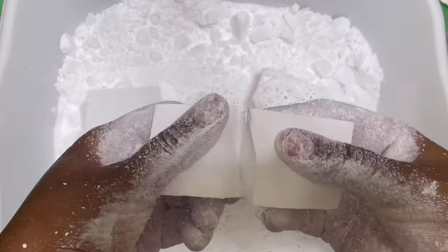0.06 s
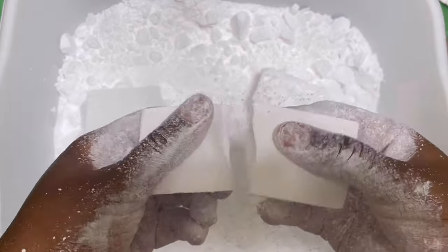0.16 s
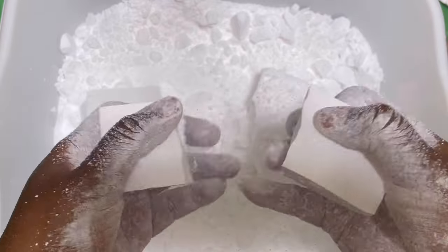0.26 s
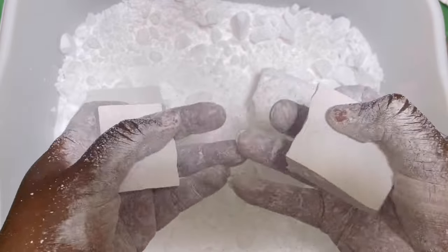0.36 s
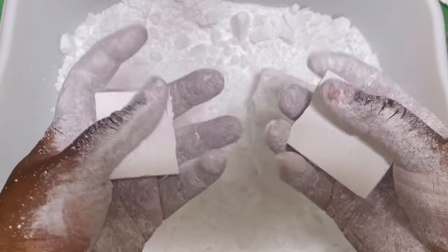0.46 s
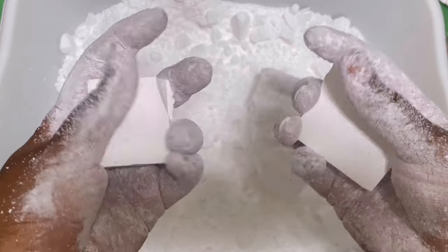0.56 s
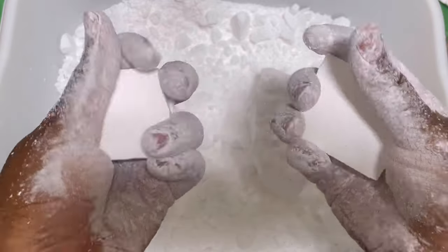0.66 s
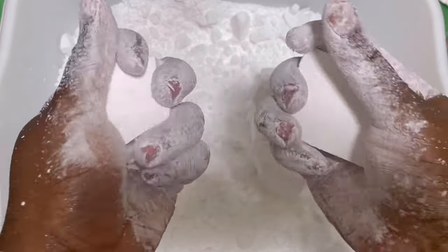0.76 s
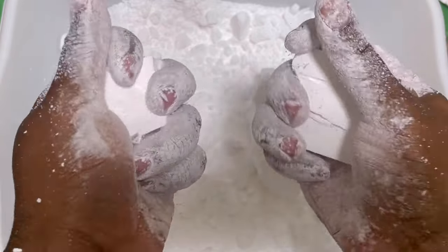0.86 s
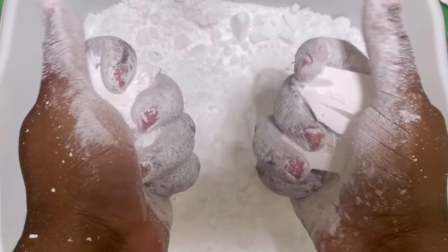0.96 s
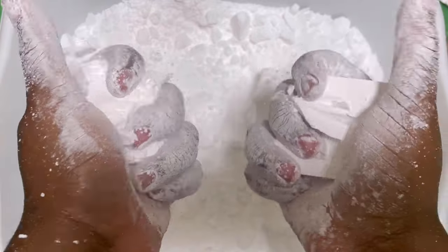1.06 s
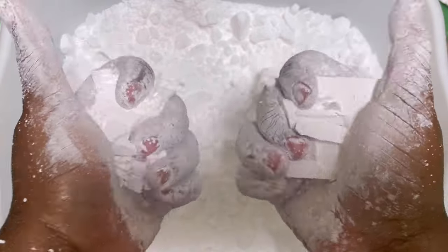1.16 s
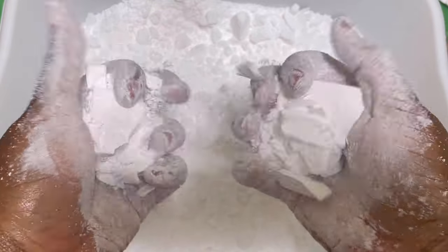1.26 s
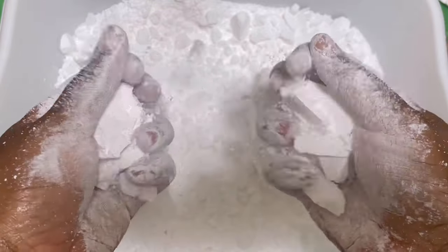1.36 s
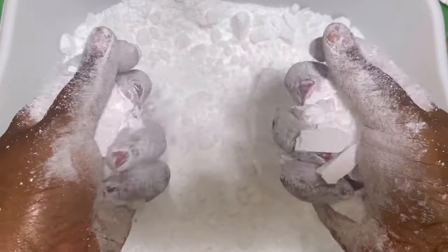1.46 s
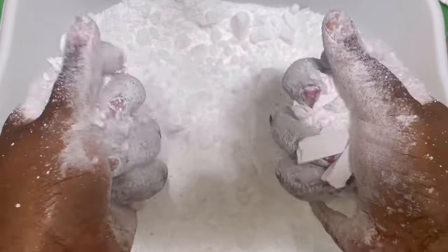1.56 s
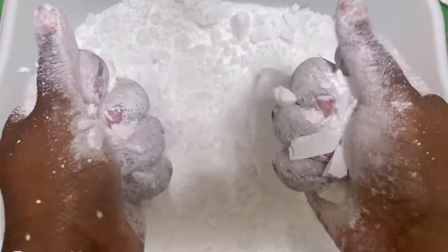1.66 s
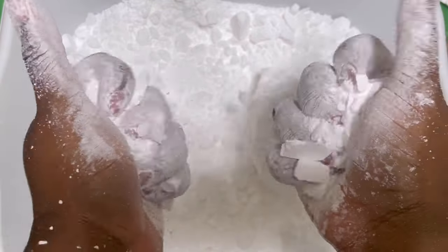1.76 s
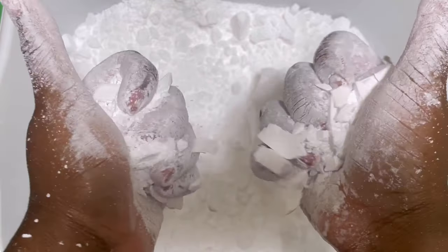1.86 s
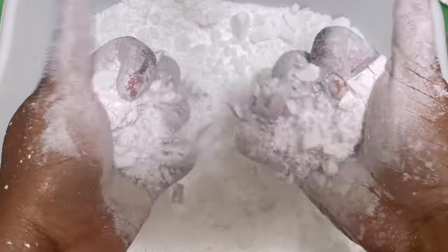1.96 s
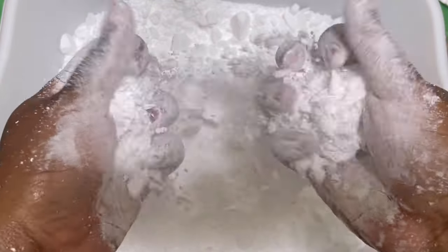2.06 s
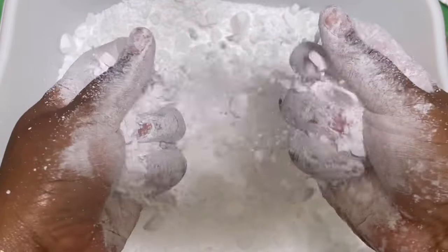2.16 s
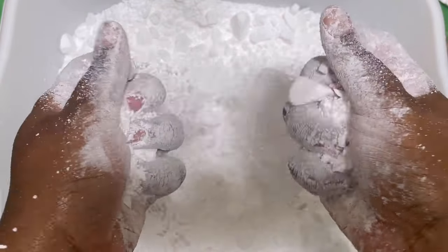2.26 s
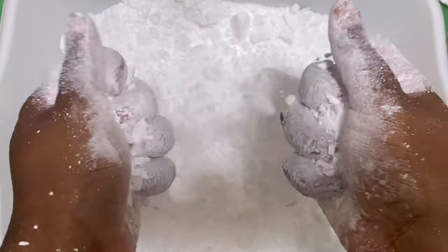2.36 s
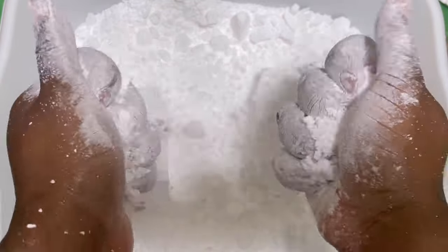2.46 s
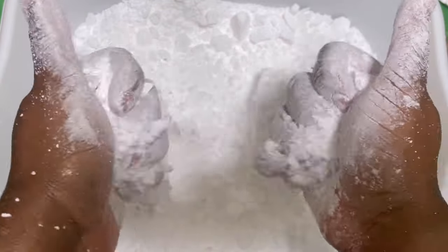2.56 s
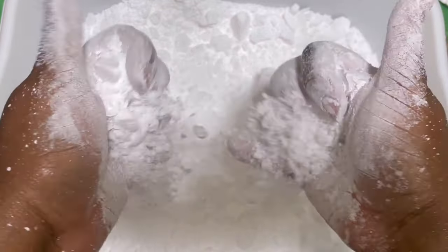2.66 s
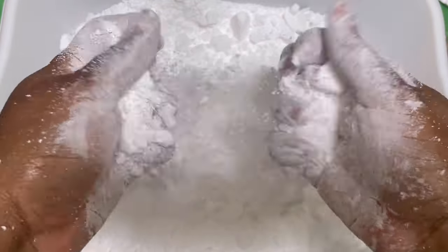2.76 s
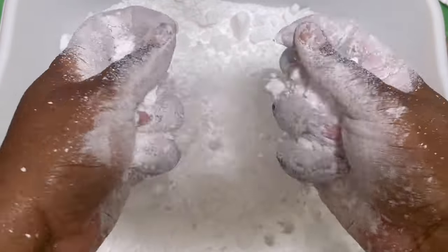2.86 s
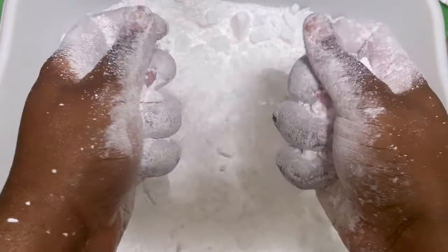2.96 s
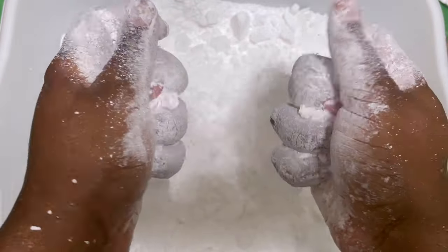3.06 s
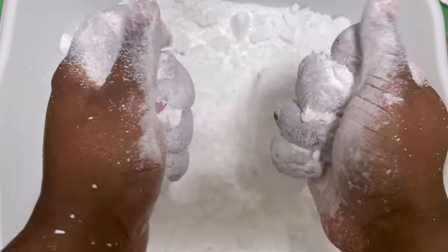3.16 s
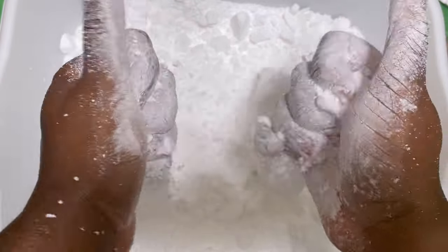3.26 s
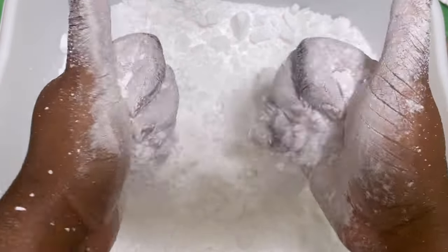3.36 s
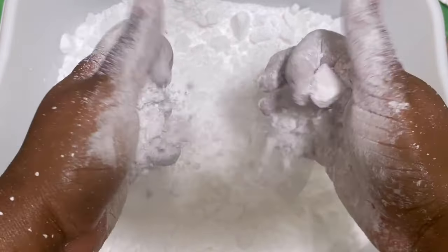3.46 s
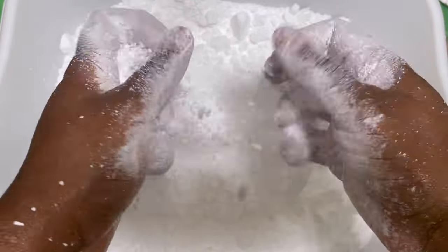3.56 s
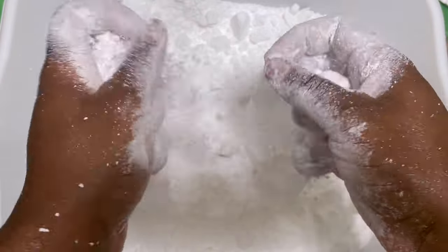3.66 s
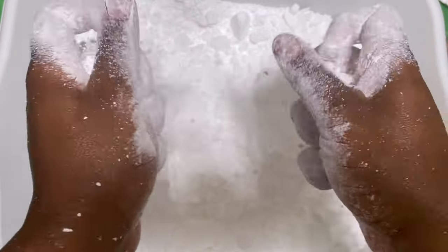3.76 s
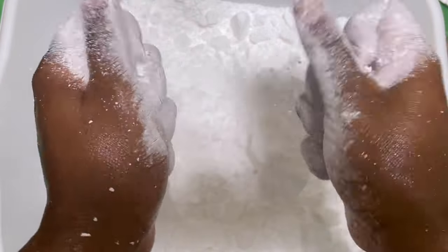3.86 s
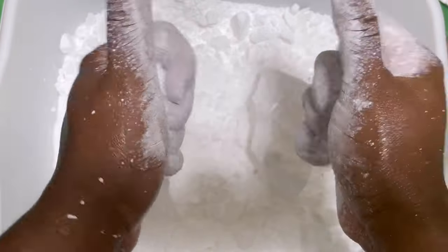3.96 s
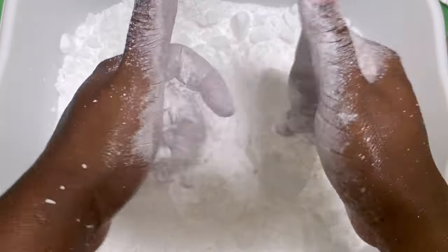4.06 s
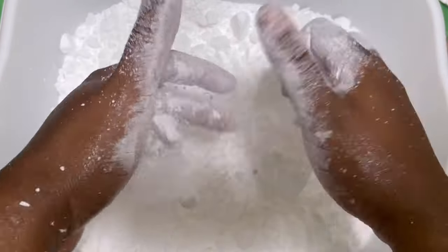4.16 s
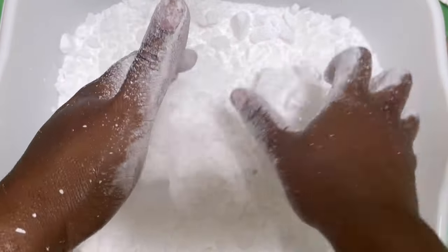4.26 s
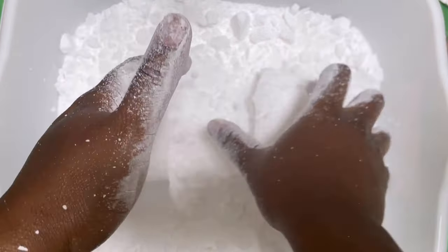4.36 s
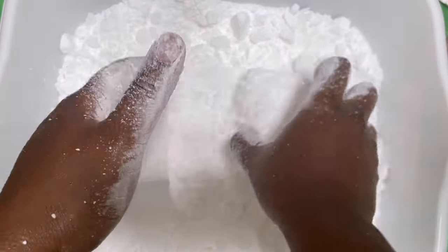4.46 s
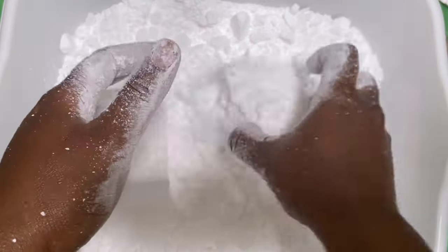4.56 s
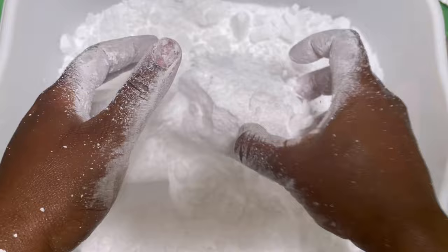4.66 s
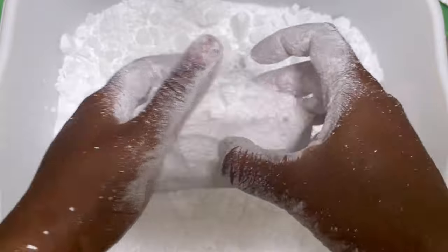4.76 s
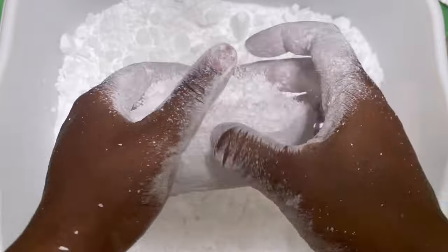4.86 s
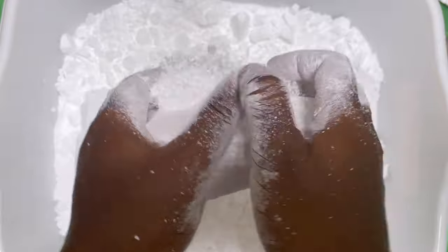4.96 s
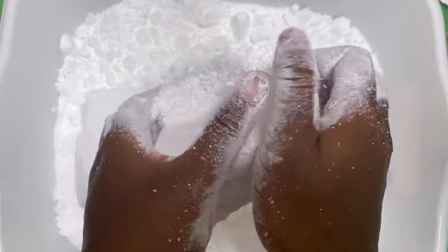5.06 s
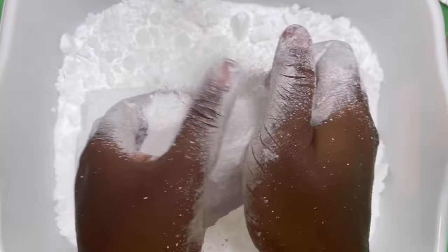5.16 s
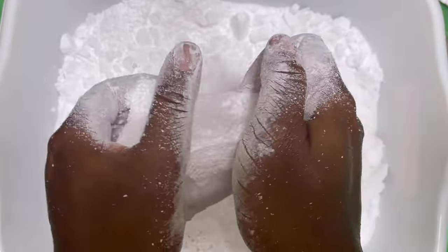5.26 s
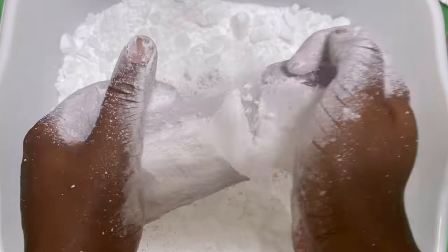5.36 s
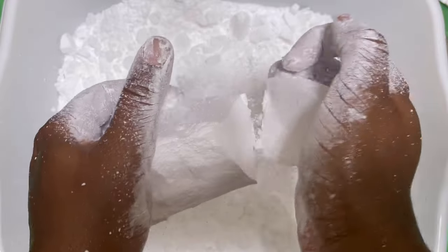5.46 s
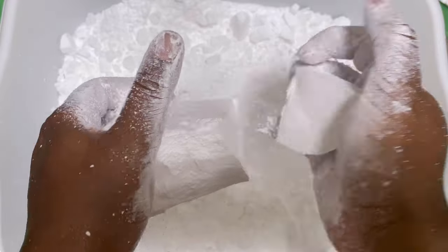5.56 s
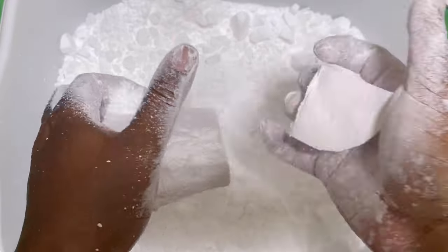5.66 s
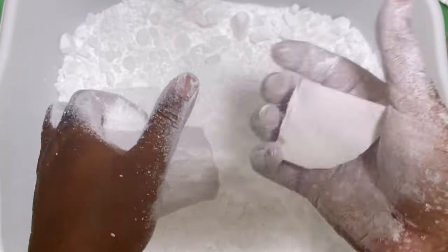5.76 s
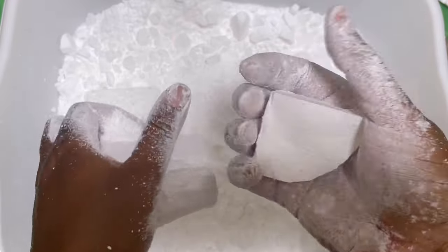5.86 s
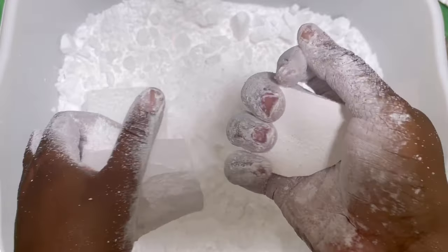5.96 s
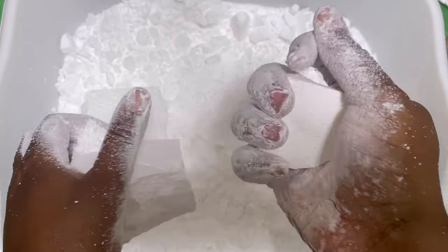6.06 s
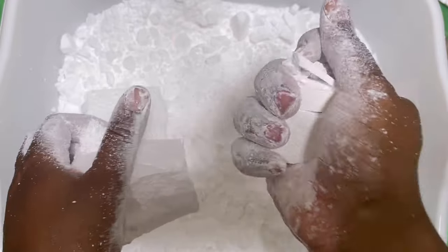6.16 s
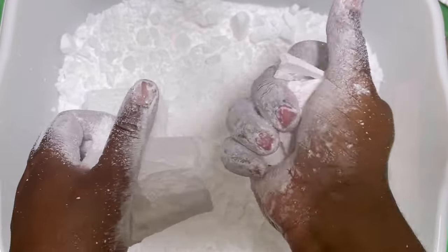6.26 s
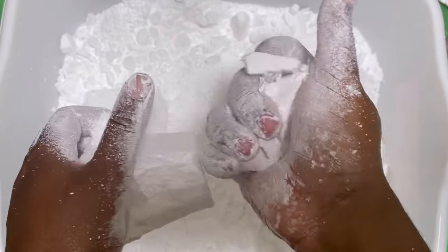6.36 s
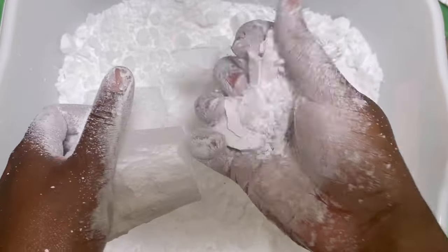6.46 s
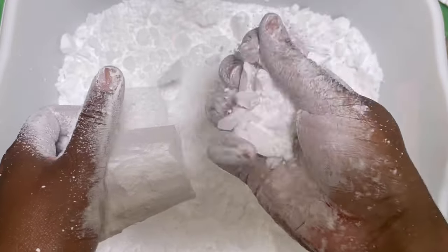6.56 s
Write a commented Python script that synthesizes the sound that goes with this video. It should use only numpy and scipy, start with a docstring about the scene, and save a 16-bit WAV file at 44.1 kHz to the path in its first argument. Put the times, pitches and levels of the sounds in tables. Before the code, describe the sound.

A quiet small room with faint hum and low hand rumble. Dusty skin brushes chalk, then blocks split in rapid, dry, brittle cracks and grind to grains, heard close and in stereo. The crunching gradually softens while crumbs fall into powder. A near-quiet pause leads to one hollow snap over a tub, then a last short cluster of cracks and tiny squeaks.

```python
"""Two hands crush dry gym chalk over a plastic tub of powder, close to the microphone in a small room.
Air, a faint hum and a fading high ring open the scene, with the last rasp of two parting chalk faces.
Skin brushes over dust; then blocks split in sharp cracks and crumble, and crumbs patter into the powder.
Blunt breaks boom in the tub, the room rings behind the hands, and two thin squeaks come near the end.
Snaps, streams of tiny rings, shaped noise and decaying tub modes make the sounds, heard by two ports."""
import sys
import numpy as np
from scipy import signal
from scipy.fft import rfft, irfft, next_fast_len
from scipy.io import wavfile
from scipy.ndimage import uniform_filter1d, map_coordinates

SR = 44100
rng = np.random.default_rng(int(sys.argv[2]) if len(sys.argv) > 2 else 0)


def file_out(sig):
    """Save sig as 16-bit WAV at sys.argv[1]."""
    # one column per channel
    cols = np.atleast_2d(sig).T
    # limit, then scale
    lim = np.clip(cols, -1, 1)
    pcm = np.round(lim * 32767).astype(np.int16)
    wavfile.write(sys.argv[1], SR, pcm)


N = 291499
TOP_HZ = 16200  # upper limit of the microphone and of every edge filter


def amp(db):
    """Decibels to gain."""
    return 10 ** (np.asarray(db) / 20)


def unit(x):
    """Scale to rms 1."""
    return x / np.sqrt(np.mean(x ** 2) + 1e-20)


def along(points, hz):
    """Read (frequency, value) points on a log frequency axis."""
    f, v = np.transpose(points)
    return np.interp(np.log(hz + 1), np.log(f + 1), v)


def wobble(rate):
    """A smooth random curve through rate knots a second."""
    knots = rng.standard_normal(int(N * rate / SR) + 4)
    at = np.arange(0, len(knots) - 1, 1 / 8)
    smooth = map_coordinates(knots, [at])
    return np.interp(np.arange(N) * rate / SR, at, smooth)


def filtered(x, response):
    """x times a complex response of frequency."""
    size = x.shape[-1]
    padded = next_fast_len(size + 8192)
    hz = np.fft.rfftfreq(padded, 1 / SR)
    return irfft(rfft(x, padded) * response(hz), padded)[..., :size]


def coloured(x, spectrum):
    """x given a spectrum, at rms 1."""
    return unit(filtered(x, lambda hz: amp(along(spectrum, hz))))


def edged(x, hz, kind, order=2):
    """x through a causal high-pass or low-pass."""
    return signal.sosfilt(signal.butter(order, min(hz, TOP_HZ), kind, fs=SR, output="sos"), x)


def evened(x, span_hz=500):
    """x with chance spectral peaks and dips levelled over span_hz, so it excites all frequencies alike."""
    z = rfft(x)
    span_bins = max(round(span_hz * x.shape[-1] / SR), 1)
    power = uniform_filter1d(np.abs(z) ** 2, span_bins, axis=-1)
    return irfft(z / np.sqrt(np.abs(power) + 1e-12), x.shape[-1])


def fuzz(hz, width_hz, drift=0):
    """A narrow band of noise at rms 1 whose centre wanders by the share drift."""
    phase = 2 * np.pi * np.cumsum(hz * (1 + drift * wobble(2.2))) / SR
    return unit(wobble(width_hz) * np.sin(phase) + wobble(width_hz) * np.cos(phase))


def strokes(rows, rise_s, stop_db_per_s, sag_db_per_s=0):
    """Gain of (start, length, dB) gestures: each rises, sags while it is held and then dies away."""
    t, power = np.arange(N) / SR, np.zeros(N)
    for s, length, db in rows:
        age = t - s
        sag_db = sag_db_per_s * np.clip(age, 0, length)
        stop_db = stop_db_per_s * np.maximum(age - length, 0)
        power += (np.clip(age / rise_s, 0, 1) * amp(db - sag_db - stop_db)) ** 2
    return np.sqrt(power)


def grains(rate, spread_db, pitch_hz, cycles, width=0.21):
    """A stereo stream of tiny breaks, each a short ring with its own size, pitch and place, at rms 1."""
    count = int(rate * N / SR)
    when, size, pitch, phase, place = rng.random((count, 5)).T[:, :, None]
    size = amp(-spread_db * np.log(size * .98 + .02))  # few large, many small
    grain_hz = pitch_hz * 2 ** (3 * pitch - 1.5)  # three octaves around pitch_hz
    turns = grain_hz * np.arange(64) / SR
    rings = size * np.exp(-turns / cycles) * np.sin(2 * np.pi * (turns + phase))
    index = ((when * N).astype(int) + np.arange(rings.shape[1])).ravel()
    sides = [rings * (1 + side * width * (place - .5)) for side in (1, -1)]
    return unit(np.array([np.bincount(index, v.ravel(), minlength=N)[:N] for v in sides]))


def add(track, s, sound):
    """Mix a sound into a track from time s on."""
    start = int(np.clip(round(s * SR), 0, N - 1))
    track[..., start:start + sound.shape[-1]] += sound[..., :N - start]


# diffuse sound at the two ports: (frequency [Hz], left-right likeness [correlation])
LIKENESS = [(120, 0.93), (400, 0.72), (1000, 0.22), (2500, 0.09), (4000, 0.16), (6500, 0.84), (8000, 1),
            (14000, 0.97)]


def diffuse(size):
    """Stereo noise from all sides: a shared part and an opposed part set how alike the ports hear it."""
    def shares(hz):
        turn = np.arccos(np.clip(along(LIKENESS, hz), -1, 1)) / 2
        return np.array([np.cos(turn), np.sin(turn)])
    mid, side = filtered(rng.standard_normal((2, size)), shares)
    return np.array([mid + side, mid - side])


# spectrum of the air in the place: (frequency [Hz], level per Hz [dB])
AIR_SPECTRUM = [(20, -2), (70, -3), (130, -7), (200, -9.5), (400, -23.5), (1000, -29.5), (4000, -33.5),
                (15000, -33)]
# tones of the hum, before they waver: (frequency [Hz], level [dB])
HUM_TONES = [(74, -64.5), (119, -57.5)]


def background(air_db=-64, waver_db=1.5, ring_hz=1880, ring_width_hz=190, ring_db=-65, ring_t60=4):
    """Room air, a wavering hum and a faint, fuzzy high ring that dies away from the start."""
    t = np.arange(N) / SR
    hum = 0
    for hz, db in HUM_TONES:
        hum = hum + amp(db + waver_db * wobble(6.8)) * np.sin(2 * np.pi * hz * t + .5 * wobble(7.1))
    ring = amp(ring_db - 60 * t / ring_t60) * fuzz(ring_hz, ring_width_hz)
    return amp(air_db) * coloured(diffuse(N), AIR_SPECTRUM) + hum + ring


# quick hand moves that push air at the microphone: (start [s], length [s], level [dB])
JOLT_MOVES = [(1.47, 0.043, -45.5), (2.45, 0.071, -50), (5.4, .08, -55.5)]
# spectrum of that rumble: (frequency [Hz], level per Hz [dB])
RUMBLE_SPECTRUM = [(10, -16.5), (28, -4), (60, 2), (100, -4), (200, -21), (600, -54.5)]


def handling(rumble_db=-61, drift_db=4.0, rise_s=0.058, stop_db_per_s=85):
    """The moving hands stir up a drifting low rumble that swells and ebbs with each quick move."""
    motion = amp(rumble_db + drift_db * wobble(3.4)) + strokes(JOLT_MOVES, rise_s, stop_db_per_s)
    return motion * coloured(diffuse(N), RUMBLE_SPECTRUM)


# the blocks scrape across each other as they part: (start [s], length [s], level [dB])
PARTING_SCRAPES = [(-0.047, 0.049, -35.5)]
# spectrum of flat chalk faces: (frequency [Hz], level per Hz [dB])
FACE_SPECTRUM = [(150, -15), (300, -14), (700, -12), (1500, -6.5), (2400, -4), (3500, -14.5), (7000, -14),
                 (12500, -22.5)]


def scrape(rise_s=.02, stop_db_per_s=160):
    """Flat chalk faces slide on each other with a smooth, hollow rasp of shaped noise."""
    return strokes(PARTING_SCRAPES, rise_s, stop_db_per_s) * coloured(diffuse(N), FACE_SPECTRUM)


# slides of skin over chalk, before the sticking: (start [s], length [s], level [dB])
SKIN_SLIDES = [(.21, 0.16, -60.5), (.58, 0.91, -66), (1.17, 1.42, -53), (2.72, 1.16, -56),
               (4.12, 0.14, -58), (4.742, 0.23, -61.5), (5.008, 0.02, -49), (6.36, 0.071, -64.5),
               (6.45, 0.018, -55), (6.555, .05, -53.5)]
# resonances of rubbed chalk: (frequency [Hz], width [Hz], level relative to the hiss [dB])
BLOCK_RESONANCES = [(3760, 220, -18.5), (5600, 540, -16.5), (6500, 120, -15.5)]
# spectrum of dusty skin, and of bright splinters: (frequency [Hz], level per Hz [dB])
DUST_SPECTRUM = [(300, -11), (1500, -7.5), (3500, -1.5), (6300, -1), (10000, -1.5), (15000, -5.5)]


def rub(drift=.035, hold_db=-73, rise_s=0.015, sag_db_per_s=3.5, stop_db_per_s=120):
    """Dusty skin brushes chalk with a soft, uneven hiss; the block's resonances shift with the grip."""
    # hold_db: skin shifting on chalk that is merely held
    slide = amp(hold_db) + strokes(SKIN_SLIDES, rise_s, stop_db_per_s, sag_db_per_s)
    block = sum(amp(db) * fuzz(hz, width_hz, drift) for hz, width_hz, db in BLOCK_RESONANCES)
    sticking = amp(3 * wobble(45) + 3.5 * wobble(400))
    hiss = coloured(diffuse(N), DUST_SPECTRUM)
    return slide * sticking * unit(hiss + block)


# squeezes of the fists, before the layer gains:
# (start [s], length [s], grinding level [dB], spilled powder level [dB])
FIST_SQUEEZES = [(0.62, 0.16, -55.5, -57.5), (0.731, 0.37, -43.5, -66), (1.187, 0.29, -50, -59.5),
                 (1.35, 0.29, -42.5, -62.5), (1.672, 0.041, -34.5, -54.5), (1.881, 0.07, -49, -64.5),
                 (2.017, 0.29, -46, -53.5), (2.23, 0.38, -48.5, -59.5), (2.689, 0.12, -47, -53),
                 (2.98, 0.16, -46, -54.5), (3.27, 0.062, -55, -57.5), (3.462, 0.29, -54.5, -57),
                 (3.73, 0.2, -46.5, -72), (4.112, 0.21, -52.5, -53), (4.37, .1, -70.5, -64),
                 (4.998, 0.04, -60.5, -58), (5.85, 0.15, -70, -89.5), (6.032, 0.085, -48.5, -58.5),
                 (6.364, 0.15, -56, -63.5)]
# spectrum of crumbs landing in loose powder: (frequency [Hz], level per Hz [dB])
POWDER_SPECTRUM = [(60, -9), (130, 0.5), (200, -5.5), (380, -4.5), (650, -14), (1200, -15.5), (4000, -45.5)]


def falling(patter_db=-2, trickle_db=-73, drop_s=0.011, rise_s=0.015, stop_db_per_s=81.5):
    """Every squeeze spills crumbs that land softly in the powder; a few trickle down all the time."""
    spills = [(s + drop_s, length, db) for s, length, _, db in FIST_SQUEEZES]  # powder lands a moment later
    flow = amp(trickle_db) + strokes(spills, rise_s, stop_db_per_s)
    crumbs = grains(rate=460, spread_db=4.0, pitch_hz=870, cycles=0.66)
    return amp(patter_db) * flow * coloured(crumbs, POWDER_SPECTRUM)


# decay of the small room: (frequency [Hz], time to fall 60 dB [s])
ROOM_DECAY = [(150, 0.73), (400, 0.34), (1000, 0.44), (3000, 0.37), (7000, 0.39), (14000, 0.24)]
# colour of its echoes: (frequency [Hz], relative level [dB])
ECHO_COLOUR = [(100, 9), (400, 2), (1000, -3), (2800, 1), (6000, -5), (12000, 0)]


def room(x, build_s=0.00033, echo_db=0.5):
    """The walls answer in uneven echoes, drawn anew every third of a second as the hands move."""
    wet, hop = np.zeros((2, N)), SR // 3
    echoes = amp(echo_db * wobble(300))
    for start in range(0, N, hop):
        hz, t, z = signal.stft(diffuse(SR // 2), SR, nperseg=256)
        decay_db = along(ECHO_COLOUR, hz)[:, None] - 60 * t / along(ROOM_DECAY, hz)[:, None]
        tail = signal.istft(z * amp(decay_db), SR, nperseg=256)[1]
        age = np.arange(tail.shape[1]) / SR
        tail = tail * (1 - np.exp(-age / build_s)) * np.roll(echoes, start)[:len(age)]
        tail = tail / np.linalg.norm(tail[0])
        add(wet, start / SR, signal.fftconvolve(x[None, start:start + hop], tail, axes=1))
    return wet


# spectrum of grinding chalk: (frequency [Hz], level per Hz [dB])
GRIT_SPECTRUM = [(200, -20.5), (500, -8.5), (1000, -1.5), (2000, -1.5), (3500, -3.5), (6000, -3),
                 (9500, -4.5), (15000, -11)]


def crumble(chip_db=-3.5, grain_db=-6, sparkle_db=-5.0, fines_db=-21, clump_db=6, burst_db=7,
            grip_s=0.031, sag_db_per_s=14, let_go_db_per_s=128):
    """Pieces grind in the fist: chips and bright splinters tick among clumped grains and fine hiss."""
    # a fist tightens, the pieces give way, the fist relaxes
    squeezes = [(s, length, db) for s, length, db, _ in FIST_SQUEEZES]
    effort = strokes(squeezes, grip_s, let_go_db_per_s, sag_db_per_s)
    bursts = unit(amp(burst_db * np.minimum(wobble(45), 1)))  # splinters fly in short volleys
    clumps = unit(amp(clump_db * np.minimum(wobble(90), 2)))
    chips = coloured(grains(rate=90, spread_db=2.7, pitch_hz=4000, cycles=0.9), GRIT_SPECTRUM)
    coarse = coloured(grains(rate=650, spread_db=1, pitch_hz=4000, cycles=0.18), GRIT_SPECTRUM)
    sparkle = coloured(grains(rate=170, spread_db=4.5, pitch_hz=8500, cycles=1.5), DUST_SPECTRUM)
    fines = coloured(diffuse(N), GRIT_SPECTRUM)
    clumped = clumps * (amp(grain_db) * coarse + amp(fines_db) * fines)
    return effort * (amp(chip_db) * chips + clumped + amp(sparkle_db) * bursts * sparkle)


# the loudest fractures, close to the microphone:
# (time [s], level over 5 ms [dB], lower edge [Hz], upper edge [Hz])
FRACTURES = [(0.6547, -34.5, 318, 7560), (0.717, -47, 2480, 10000), (0.7351, -35.5, 312, 7700),
             (0.7421, -28, 2980, 14900), (0.7556, -14.5, 480, 3700), (0.8106, -24, 900, 8100),
             (0.8121, -24, 1510, 6130), (0.8152, -20.5, 302, 9420), (0.826, -21, 1600, 5000),
             (0.8778, -14.5, 560, 5600), (0.8926, -19, 700, 2200), (0.9337, -23.5, 1530, 6550),
             (0.9462, -18.5, 2100, 9100), (0.985, -22.5, 2020, 3070), (1.025, -40, 1410, 10500),
             (1.0854, -36, 398, 7160), (1.3454, -38, 2620, 7000), (1.377, -35, 3250, 7500),
             (1.392, -32, 1290, 4000), (1.414, -31, 2600, 6960), (1.4296, -28.5, 3020, 5370),
             (1.5109, -27, 486, 10200), (1.5161, -27, 3000, 9000), (1.6792, -26, 457, 4170),
             (1.6941, -30, 3020, 8800), (1.7127, -15.5, 2880, 4730), (1.7724, -27, 760, 6100),
             (1.9716, -40.5, 9550, 12000), (2.0107, -39.5, 5030, 10000), (2.0542, -42, 1300, 5600),
             (2.065, -46, 1800, 5800), (2.1833, -40, 3500, 12200), (2.2392, -28.5, 2130, 6100),
             (2.28, -36, 2500, 11000), (2.2924, -30.5, 1970, 7000), (2.3625, -26, 2200, 10300),
             (2.3958, -36, 1480, 4440), (2.435, -39, 2210, 7000), (2.4474, -42, 2000, 6760),
             (2.4922, -25, 3260, 5040), (2.7307, -35, 1470, 2720), (2.8324, -48, 1800, 3100),
             (3.032, -37, 2000, 10100), (3.04, -37, 3000, 9000), (3.0528, -31, 750, 7400),
             (3.0753, -42, 1410, 3800), (3.167, -41, 1500, 7000), (3.2557, -34.5, 2000, 6200),
             (3.2726, -40.5, 1080, 2730), (3.3023, -45.5, 1000, 4500), (3.598, -47.5, 1850, 8550),
             (3.6624, -43, 1670, 9400), (3.7175, -41, 474, 3820), (3.755, -42, 2200, 5400),
             (3.7687, -33.5, 1520, 4000), (3.823, -46.5, 2800, 8300), (3.871, -34, 960, 3300),
             (3.965, -42.5, 3030, 7200), (4.1537, -51.5, 1370, 7500), (4.2427, -48.5, 3500, 10600),
             (4.488, -52, 2680, 9000), (4.5156, -47, 1004, 2540), (4.9438, -58, 3500, 7000),
             (5.2789, -26, 500, 4200), (5.8618, -51, 2580, 5760), (5.916, -53.5, 2400, 5600),
             (5.9906, -51, 1580, 3600), (6.035, -39, 2880, 5500), (6.052, -19.5, 2000, 6200),
             (6.0964, -37, 3730, 8600), (6.1069, -33, 2600, 10000), (6.1489, -20.5, 940, 3140),
             (6.1674, -22, 625, 8050), (6.1858, -30, 1410, 4840), (6.33, -40, 2160, 3120),
             (6.3803, -45.5, 1830, 9450), (6.424, -44.5, 1920, 4800), (6.474, -46.5, 2000, 7960),
             (6.574, -41, 685, 6500)]
# tearing time of a piece with that lower edge; bigger, lower pieces tear longer by the exponent
TEAR_MS, TEAR_PIECE_HZ, TEAR_GROWTH = 0.39, 960, 0.31


def cracks(splinters=2.54, lead=0.83, settle_db=-17, settle_ms=4.1, splinter_hz=1300, spread=.75,
           click_db=-11, click_low_hz=200, clean_hz=3800, ring_db=-13, ring_q=5, palm_ms=0.18, palm_db=-9):
    """Each fracture is a solid snap in a swarm of bright micro-breaks, with a brief ring of the piece."""
    track = np.zeros((2, N))
    ms = np.arange(-SR // 200, SR // 40) / SR * 1000
    snap = 1. * (ms == 0)
    click = unit(edged(snap, click_low_hz, "highpass"))
    for s, db, low_hz, high_hz in FRACTURES:
        tear_ms = TEAR_MS * (TEAR_PIECE_HZ / low_hz) ** TEAR_GROWTH
        swarm = np.exp(-np.abs(ms) / (tear_ms * np.where(ms < 0, lead, 1)))  # the break runs up, then dies out
        swarm += amp(settle_db) * (ms > 0) * np.exp(-np.abs(ms) / settle_ms)  # the fresh faces scrape
        breaks = diffuse(len(ms))
        breaks = spread * breaks + (1 - spread) * breaks.mean(axis=0)  # close by: both ports hear much the same
        bright = unit(edged(swarm * breaks, splinter_hz, "highpass"))
        force = evened(splinters * bright + unit(snap))  # the snap alone carries the body
        force = edged(edged(force, low_hz, "highpass"), high_hz, "lowpass")
        # the cupped palm reflects each break and colours it anew
        delay = round(palm_ms * SR / 1000 * 2 ** (rng.random() - .5))
        palm = np.roll(edged(force, splinter_hz * 2, "lowpass"), delay, axis=1)
        force = force + amp(palm_db) * palm
        sharpness = min(high_hz / clean_hz, 1) ** 2  # clean breaks click fully, blunt ones hardly
        piece_hz = min(np.sqrt(low_hz * high_hz), TOP_HZ)
        ring = signal.lfilter(*signal.iirpeak(piece_hz, ring_q, fs=SR), force)
        crack = unit(force) + amp(ring_db) * unit(ring) + amp(click_db) * sharpness * click
        over_5_ms = np.sqrt(SR / 200 / len(ms))
        add(track, s + ms[0] / 1000, amp(db) * unit(crack) * over_5_ms)
    return track


# blunt breaks that set the tub booming: (time [s], gain [dB], upper edge [Hz])
BLUNT_BREAKS = [(0.7565, -43.5, 1480), (1.5108, -53.5, 860), (2.9549, -37, 1700), (5.2796, -25, 2690)]
# the tub's modes: (frequency [Hz], relative level before chance [dB], time to fall 60 dB [s])
TUB_MODES = [(252, -2, 0.41), (334.3, -1, 0.16), (377, -2.5, .3), (418, -5, .28), (560, -4.5, 0.18),
             (607, -4.5, 0.2), (2347, -7.5, .22)]
# its dense upper modes: (frequency [Hz], level per Hz [dB])
KNOCK_SPECTRUM = [(80, -13.5), (170, 3.5), (260, 6), (760, 3), (1200, -1), (2500, -1.5), (4500, -15.5)]


def tub(attack_s=0.0012, modes_db=-4.5, knock_db=-4, knock_t60=0.44, push_db=-14, push_low_hz=420):
    """A blunt push wakes a few tub modes and a wash of dense ones, all cut steeply at its upper edge."""
    track, t = np.zeros((2, N)), np.arange(SR // 2) / SR
    for s, db, edge_hz in BLUNT_BREAKS:
        ring = 0
        for hz, level, t60 in TUB_MODES:
            decay = amp(level + rng.normal(0, 1) - 60 * t / t60)
            ring = ring + decay * np.sin(2 * np.pi * (hz * t + rng.random()))
        wash = amp(knock_db - 60 * t / knock_t60) * coloured(diffuse(len(t)), KNOCK_SPECTRUM)
        boom = (amp(modes_db) * ring + wash) * (1 - np.exp(-t / attack_s))
        boom = edged(boom, edge_hz, "lowpass", order=6)
        push = edged(1. * (t == 0), push_low_hz, "highpass")
        push = unit(edged(push, edge_hz, "lowpass", order=6))
        # half a cycle early, as the steep filter delays the blow
        add(track, s - 1 / edge_hz / 2, amp(db) * (amp(push_db) * push + boom))
    return track


# squeaks of chalk on chalk: (start [s], length [s], level [dB], pitch [Hz])
CHALK_SQUEAKS = [(6.475, 0.07, -63, 2657), (6.572, .012, -57.5, 3470)]


def squeaks(rise_s=0.0083, stop_db_per_s=500, width_hz=25):
    """Two pieces stick and slip on each other: a thin, brief tone made of very narrow noise."""
    track = 0
    for s, length, db, hz in CHALK_SQUEAKS:
        track = track + strokes([(s, length, db)], rise_s, stop_db_per_s) * fuzz(hz, width_hz)
    return track


def scene(room_db=-6.0):
    """The hands close by, the room around them."""
    hands = scrape() + cracks() + crumble() + rub() + squeaks() + falling()
    return hands + amp(room_db) * room(hands.mean(axis=0)) + tub() + handling() + background()


# level between the microphone ports: (frequency [Hz], left minus right [dB])
PORT_BALANCE = [(150, 0.5), (500, 1.5), (1200, 1), (2500, 2), (4500, 2.5), (7000, 1), (12000, -0.5)]
# phase between the microphone ports: (frequency [Hz], lead of the left [rad])
PORT_LEAD = [(100, 0), (900, 0.26), (2800, 0.63), (4000, 1.0), (5500, 0.2), (6800, 1.2), (7600, 2),
             (8250, 3.14), (9500, 4.8), (11200, 6.3), (12800, 7.5), (13800, 9.5)]


def record(dry):
    """Two microphone ports differ in level and phase; peaks clip at full scale, the top treble rolls off."""
    treble = [(10500, 0.5), (13000, -2.0), (15500, -15)]  # (frequency [Hz], level [dB])

    def ports(hz):
        half = amp(along(PORT_BALANCE, hz) / 2) * np.exp(.5j * along(PORT_LEAD, hz))
        return amp(along(treble, hz)) * np.array([half, 1 / half])
    heard = np.clip(filtered(dry, ports), -1, 1)
    return filtered(heard, lambda hz: 1 / (1 + (hz / TOP_HZ) ** 120))


dry = scene()
out = record(dry)
file_out(out)
```